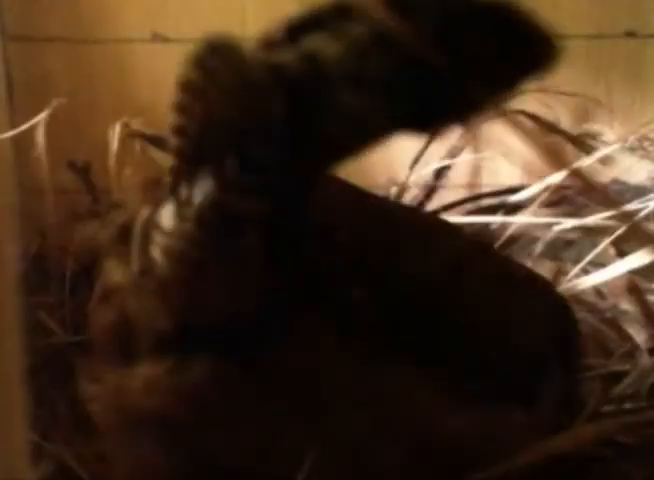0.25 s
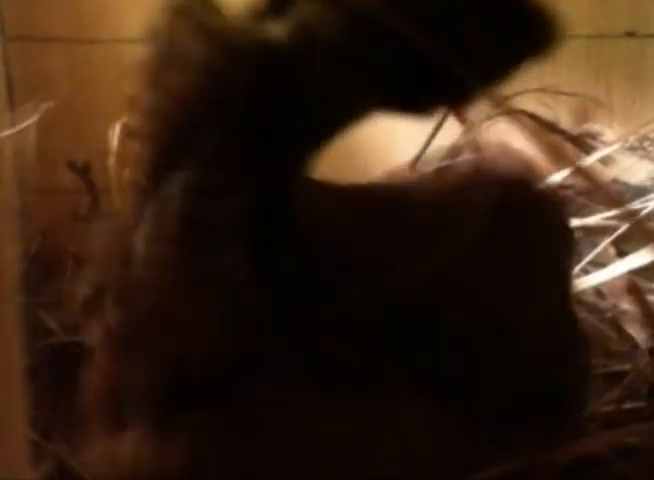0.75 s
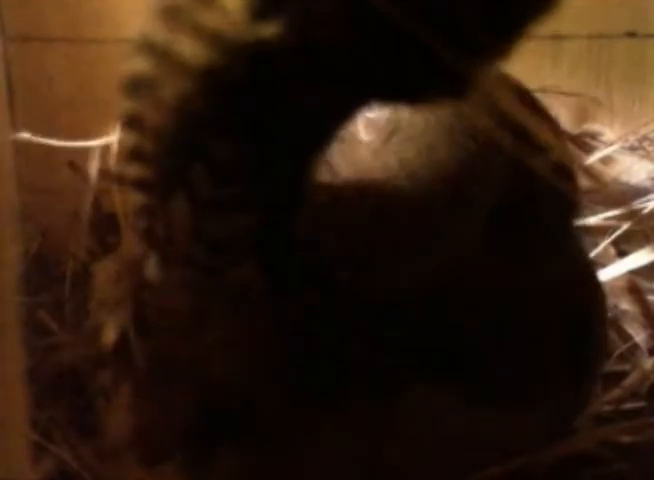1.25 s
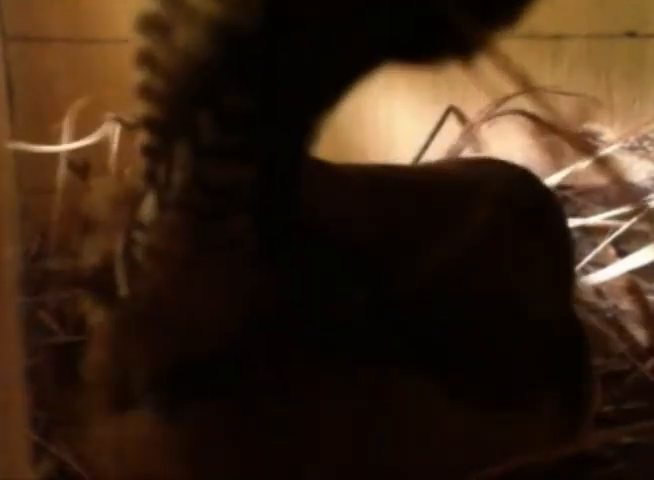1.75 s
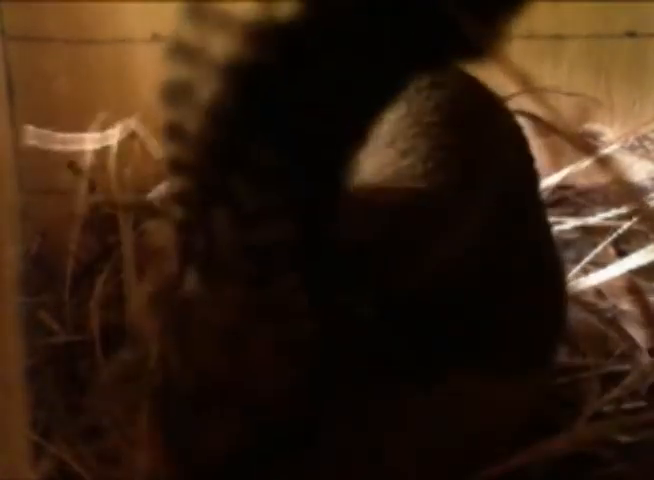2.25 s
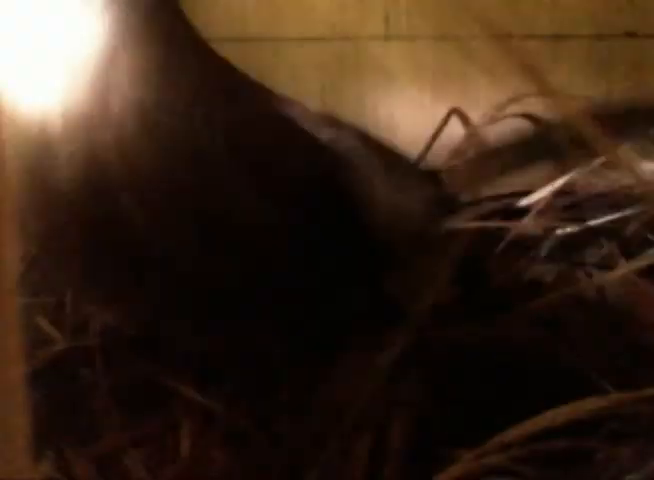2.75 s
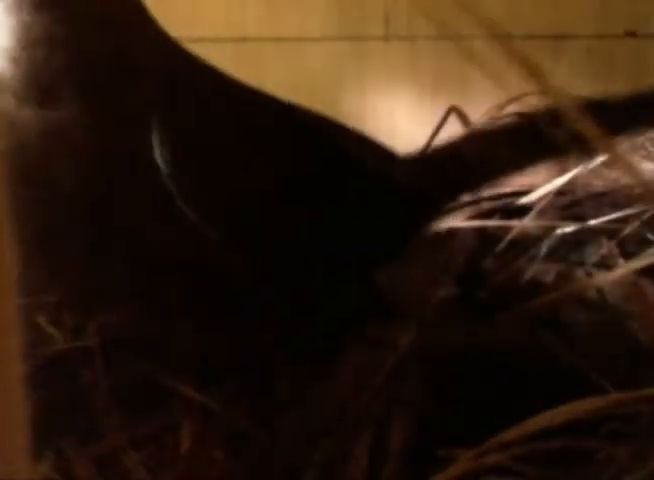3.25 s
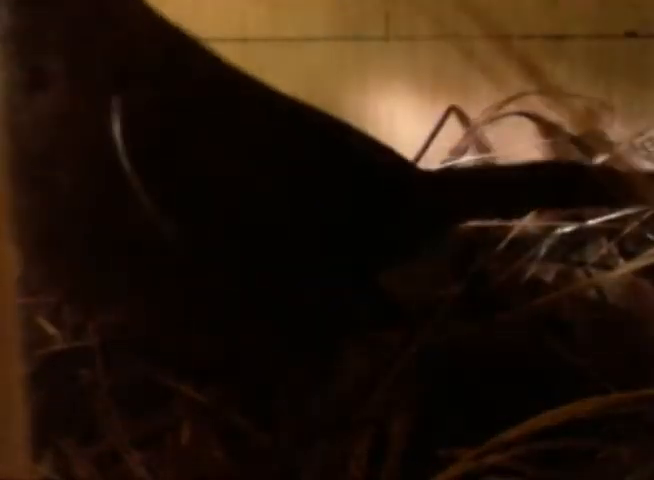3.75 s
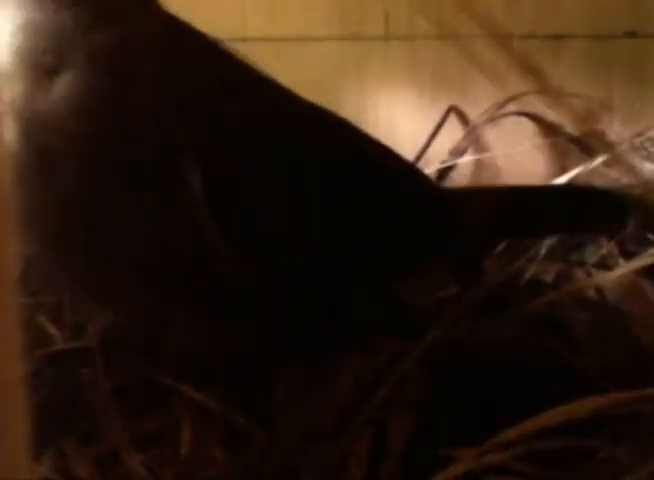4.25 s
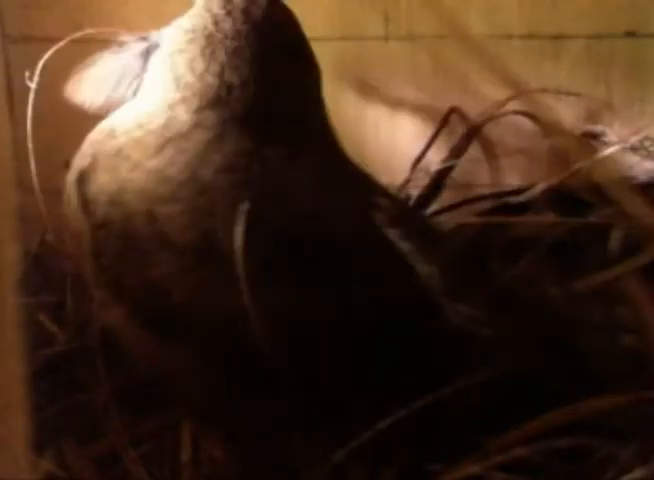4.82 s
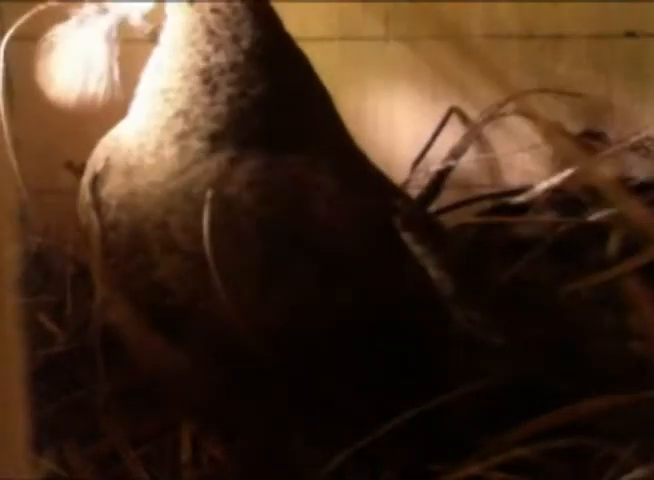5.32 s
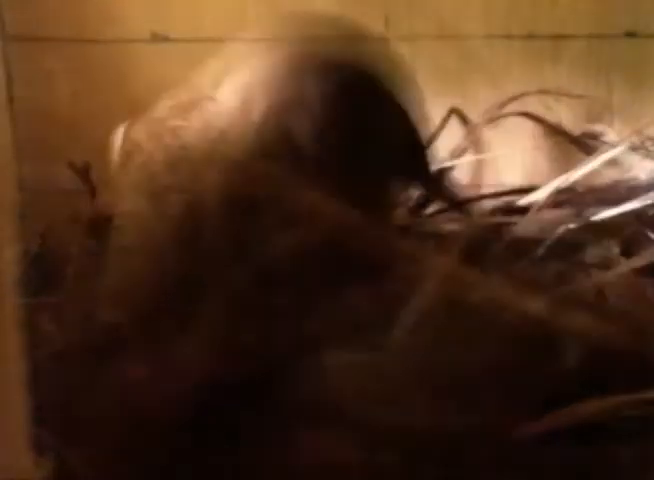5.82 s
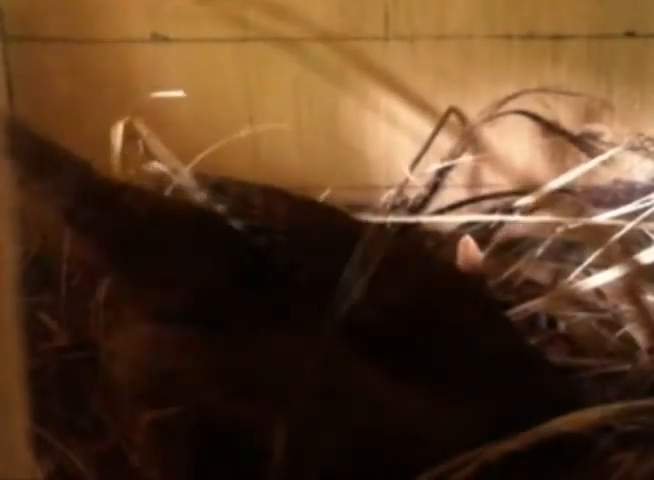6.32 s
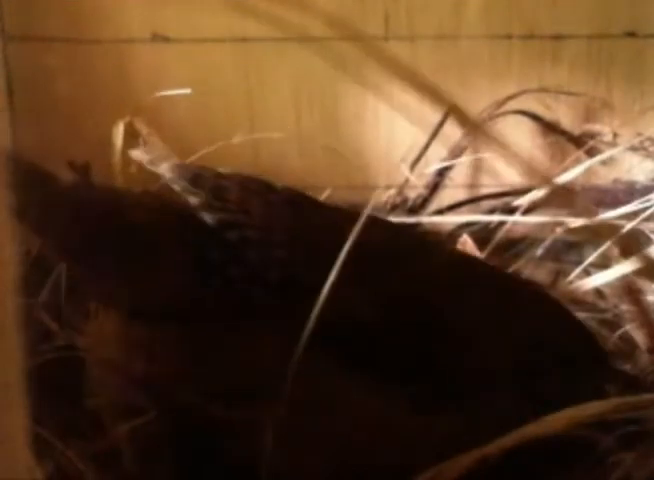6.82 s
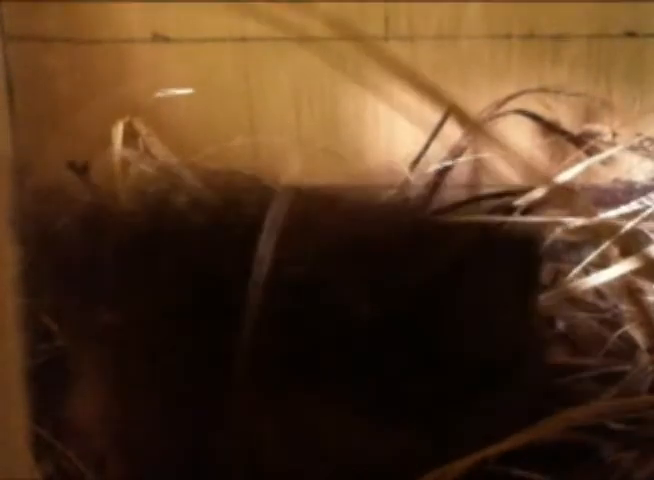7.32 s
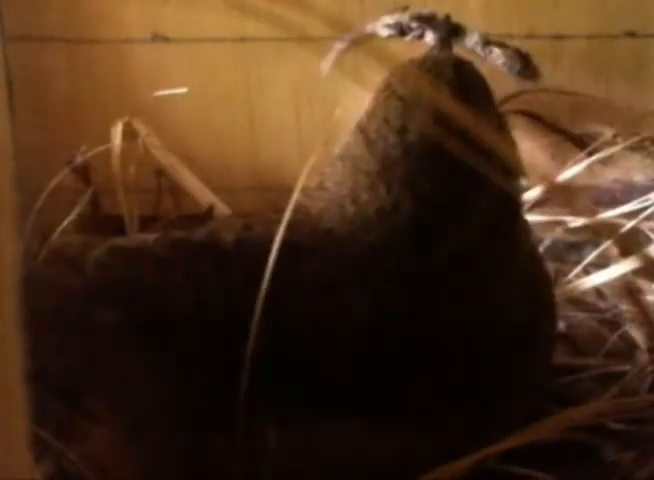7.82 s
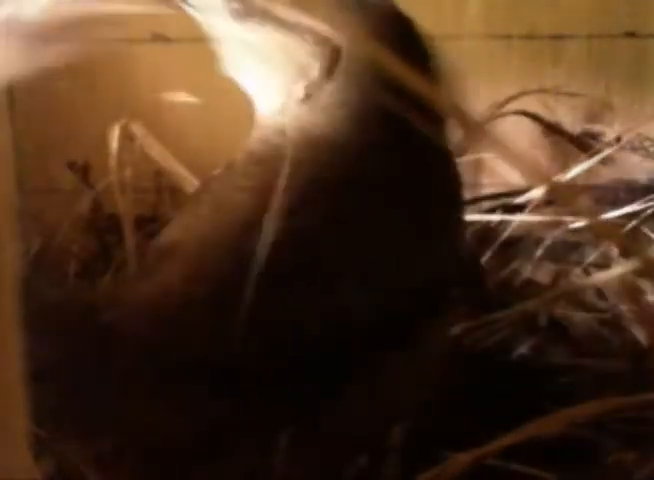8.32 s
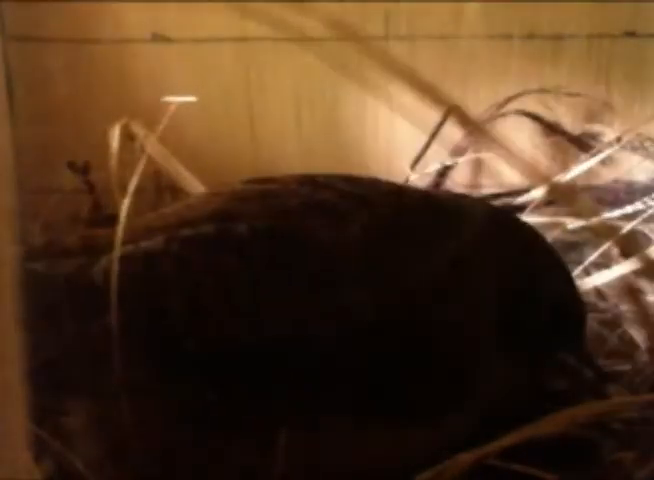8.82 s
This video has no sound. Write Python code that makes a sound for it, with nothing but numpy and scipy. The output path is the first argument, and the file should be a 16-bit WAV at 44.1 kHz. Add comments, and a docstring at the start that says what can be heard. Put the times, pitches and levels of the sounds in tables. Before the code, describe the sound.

Dry rustles and soft bumps in a nest box, with two bright bursts of wren song, distant birds and microphone hiss.

```python
"""Inside a wooden nest box. A low outdoor murmur and a small camera microphone's hiss and whine throughout.
First a bird in the box settles, treads and shuffles in dry grass and bumps the boards.
From 0.5 s other birds call far off. At 1.2 s a wren outside leads with soft chatter into a bubbling phrase.
The bird in the box stirs again near 4 s and 6 s; at 6.5 s the wren starts its second chatter and phrase."""
import sys
import numpy as np
from scipy import signal
from scipy.fft import rfft, irfft, next_fast_len
from scipy.io import wavfile

SR = 44100
rng = np.random.default_rng(int(sys.argv[2]) if len(sys.argv) > 2 else 0)


def generate_wav(signal):
    """Clip the signal to [-1, 1] and save it as 16-bit WAV at the path in sys.argv[1]."""
    frames = np.transpose(np.atleast_2d(signal))
    scaled = np.clip(frames, -1, 1) * 32767
    pcm = np.round(scaled).astype(np.int16)
    wavfile.write(sys.argv[1], SR, pcm)


N = 399987


def undb(db):
    """Decibels to gain."""
    return 10 ** (np.asarray(db) / 20)


def level(x, db):
    """Scale to an rms level."""
    return x * undb(db) / np.sqrt(np.mean(x ** 2))


def add(out, start_s, x):
    """Mix x into out from start_s on."""
    i = max(int(start_s * SR), 0)
    out[i:i + len(x)] += x[:len(out) - i]


def colour(x, points):
    """Filter by a curve of (frequency [Hz], gain [dB]) points."""
    hz, db = np.transpose(points)
    size = next_fast_len(len(x), real=True)
    bins_hz = np.maximum(np.fft.rfftfreq(size, 1 / SR), 1)
    gain = undb(np.interp(np.log(bins_hz), np.log(hz), db))
    return irfft(rfft(x, size) * gain, size)[:len(x)]


def ring(x, modes):
    """Damped resonances, neighbours in opposite phase; white noise keeps its level."""
    t = np.arange(SR // 10) / SR
    response = 0
    for k, (hz, width_hz, db) in enumerate(modes):
        decay = undb(db) * width_hz * np.exp(-np.pi * width_hz * t)
        response += (-1) ** k * decay * np.sin(2 * np.pi * hz * t)
    return signal.oaconvolve(x, response / np.linalg.norm(response))[:len(x)]


def walk(size, rate_hz):
    """Random wander, spread near 1."""
    steps = np.arange(size) * rate_hz / SR
    knots = int(steps[-1]) + 2
    return np.interp(steps, np.arange(knots), rng.standard_normal(knots))


def outdoors():
    """A low murmur swells a little and sounds the hollow of the box."""
    # murmur spectrum: (frequency [Hz], gain [dB])
    murmur_curve = [(20, 0.5), (38, 3), (60, -0.5), (120, -3), (230, -6.5), (400, -9), (650, -14),
                    (1000, -18), (2000, -22), (5000, -35), (15000, -51)]
    # box hum: (frequency [Hz], width [Hz], gain [dB])
    hollow_modes = [(282.3, 22, 2.5), (372, 20, -19), (469, 35, -2), (1200, 110, -16)]
    murmur = level(colour(rng.standard_normal(N), murmur_curve), db=-43.5)
    hollow = level(ring(rng.standard_normal(N), hollow_modes), db=-51)
    return murmur * undb(0.6 * walk(N, rate_hz=6.7)) + hollow * undb(0.65 * walk(N, rate_hz=5))


def floor_thumps(crest=0.35):
    """The bird lets its weight down on the padded floor."""
    # settling: (time [s], time scale [s], level [dB])
    settles = [(.008, 0.056, -32), (0.127, 0.059, -39)]
    # dull floor spectrum: (frequency [Hz], gain [dB])
    floor_curve = [(60, -7), (170, -2.5), (270, -1), (380, -13), (1000, -47)]
    load = np.zeros(N)
    for start_s, scale_s, db in settles:
        u = np.arange(int(5 * scale_s * SR)) / (scale_s * SR)
        add(load, start_s, undb(db) * (u / crest) * np.exp(1 - u / crest))
    return load * level(colour(rng.standard_normal(N), floor_curve), db=0)


def contacts(snap_s=0.005, rebound_s=0.013, rebound_db=-13):
    """Moves in the nest: (time [s], time scale [s], straw/boards/box levels [dB])."""
    # straws snapping under a claw: (time [s], level [dB])
    straw_snaps = [(0.0718, -23.5), (0.1118, -27), (0.149, -29.5), (0.319, -30.5), (.365, -37), (.574, -36),
                   (1.705, -41), (3.282, -39), (5.895, -31.5)]
    # claws on the boards: (time [s], time scale [s], level [dB])
    scratches = [(.08, 0.02, -33.5), (.155, 0.047, -40), (.282, 0.03, -42.5), (.328, 0.033, -33),
                 (.366, 0.025, -34), (.462, .016, -31)]
    # feathers through straw: (time [s], time scale [s], level [dB])
    shuffles = [(.225, 0.027, -41.5), (.531, 0.04, -32), (.935, 0.044, -41), (.99, 0.18, -45.5),
                (1.054, .03, -36.5), (1.098, .05, -40.5), (3.965, 0.077, -43), (5.924, 0.075, -40),
                (5.986, .043, -38), (6.04, 0.071, -41)]
    # body against the walls: (time [s], time scale [s], level [dB])
    bumps = [(.466, 0.016, -29), (.548, 0.016, -29), (.595, 0.035, -37), (1.066, 0.017, -35),
             (5.888, 0.041, -36)]
    # split per kind of contact: (straw [dB], boards [dB], box [dB])
    split_db = {"snap": (0, -6, -8.5), "scratch": (-9, 0, -3.9), "shuffle": (0, -5.5, 1.3),
                "bump": (-16, -15, 0)}
    snaps = [(start_s + lag_s, snap_s, db + drop_db) for start_s, db in straw_snaps
             for lag_s, drop_db in ((0, 0), (rebound_s, rebound_db))]  # each stem springs back once
    moves = {"snap": snaps, "scratch": scratches, "shuffle": shuffles, "bump": bumps}
    return [(start_s, scale_s, db + np.array(split_db[kind]))
            for kind, rows in moves.items() for start_s, scale_s, db in rows]


def nest(grain_db=0.5, slip_hz=600, crest=0.26, linger=0.16, straw_db=1.4, boards_db=-3, box_db=-1):
    """Each contact is a run of tiny slips: straw crackles, boards rasp, the box thuds."""
    # dry straw spectrum: (frequency [Hz], gain [dB])
    straw_curve = [(1500, -13), (4000, -6), (5400, -4.5), (6500, -3), (8500, -4), (10300, 2.5), (11500, 0),
                   (12300, 3.5), (12900, -3), (15500, -6)]
    # board resonances: (frequency [Hz], width [Hz], gain [dB])
    board_modes = [(1280, 68, 10), (1670, 110, -1), (2290, 165, 4), (2670, 93, 5.5), (3340, 280, 1),
                   (3910, 140, 0), (6340, 700, -5)]
    # box resonances: (frequency [Hz], width [Hz], gain [dB])
    box_modes = [(155, 76, -5.5), (208, 26, -4.5), (314, 68, -1.5), (390, 55, 0), (501, 73, 1.5),
                 (600, 66, -29.5)]
    drives = np.zeros((3, N))
    for start_s, scale_s, levels_db in contacts():
        u = np.arange(int(5 * scale_s * SR)) / (scale_s * SR)
        push = (u / crest) * np.exp(1 - u / crest) + linger * u * np.exp(1 - u)  # shove, then stems settle
        slips = level(undb(grain_db * walk(len(u), slip_hz)), db=0)
        for drive, db in zip(drives, levels_db):
            add(drive, start_s, undb(db) * push * slips * rng.standard_normal(len(u)))
    crackle = undb(straw_db) * colour(drives[0], straw_curve)
    rasp = undb(boards_db) * ring(drives[1], board_modes)
    thud = undb(box_db) * ring(drives[2], box_modes)
    return crackle + rasp + thud


def whistle(length_s, pitches_hz, crest, rough, flutter_hz, wobble, swell_power=0.83):
    """A glide through three pitches, swelling and fading; an unsteady membrane shakes it."""
    u = np.linspace(0, 1, int(length_s * SR))
    glide_hz = np.polyval(np.polyfit([0, 0.5, 1], pitches_hz, 2), u)
    pitch_hz = glide_hz * (1 + rough * wobble * walk(len(u), flutter_hz))
    swell = np.interp(u, [0, np.clip(crest, 0.1, 0.9), 1], [0, 1, 0]) ** swell_power
    flutter = 1 + 0.5 * rough * walk(len(u), flutter_hz)
    return swell * flutter * np.sin(2 * np.pi * np.cumsum(pitch_hz) / SR)


def far_birds(direct_db=-7):
    """Thin whistles and hoarse calls, half lost in their echo."""
    # distant calls: (time [s], kind, level [dB])
    far_calls = [(.49, "pip", -43), (.62, "pip", -46.5), (.655, "tsip", -46), (.95, "sweep", -49),
                 (1.185, "sweep", -46.5), (1.46, "sweep", -51.5), (2.42, "caw", -41.5),
                 (3.925, "wisp", -40), (3.93, "tsip", -47), (4.015, "wisp", -46), (4.21, "caw", -45),
                 (4.28, "tsip", -55), (4.44, "tsip", -47.5), (4.625, "wisp", -47), (4.63, "tsip", -51),
                 (4.765, "pip", -43.5), (5.945, "wisp", -40), (6.02, "wisp", -44), (6.129, "see", -47.5),
                 (6.35, "see", -45), (6.541, "wisp", -41), (7.14, "caw", -42.5), (8.0, "sweep", -49.5),
                 (8.14, "sweep", -48.5), (8.3, "see", -45)]
    # glide per kind: (length [s], start [Hz], middle [Hz], end [Hz], crest [of length], roughness [0-1])
    call_kinds = { "pip": (0.038, 2800, 2780, 2760, 0.27, .03), "wisp": (.055, 4450, 4350, 4000, 0.2, 0.67),
                  "see": (0.11, 6450, 6450, 5700, 0.13, 0.17),
                  "tsip": (0.059, 6650, 6700, 6500, 0.22, 0.47),
                  "sweep": (.22, 4900, 6750, 5600, 0.43, 0.51),
                  "caw": (0.317, 1200, 1255, 1210, 0.27, 0.52), }
    calls = np.zeros(N)
    for start_s, kind, db in far_calls:
        length_s, *pitches_hz, crest, rough = call_kinds[kind]
        call = whistle(length_s, pitches_hz, crest, rough, flutter_hz=604, wobble=0.09)
        add(calls, start_s, undb(db) * call)
    return undb(direct_db) * calls + garden_echo(calls, early_db=-8.5, late_db=-4.5)


def garden_echo(x, early_db, late_db, early_t60_s=0.28, late_t60_s=0.67):
    """Scatter from near leaves and walls, then a longer wash from the trees."""
    # echo spectrum: (frequency [Hz], gain [dB])
    echo_curve = [(1000, -14), (3000, 2), (4300, -2), (5800, 8), (7000, 0), (9000, -1.5)]
    t = np.arange(SR) / SR
    onset = 1 - np.exp(-t / 0.0011)
    response = 0
    for db, t60_s in ((early_db, early_t60_s), (late_db, late_t60_s)):
        tail = colour(rng.standard_normal(SR), echo_curve) * undb(-60 * t / t60_s) * onset
        response += undb(db) * tail / np.linalg.norm(tail)
    return signal.fftconvolve(x, response)[:N]


def wren(song_db=-7, chatter_db=-6.5):
    """Buzzy chatter, then clear notes, scattered by the garden and entering by the hole."""
    # nasal lead-in: (time [s], count, pitch length [s], pitch [Hz], level [dB])
    chatter = [(1.284, 1, 0.029, 615, -45.5), (1.365, 1, 0.029, 614, -47.5), (1.469, 1, .075, 777, -43),
               (1.647, 3, 0.02, 533, -43.5), (1.865, 1, 0.038, 560, -41.5), (2.126, 1, 0.024, 595, -38.5),
               (6.669, 1, 0.025, 624, -46), (6.79, 1, .066, 592, -43), (6.969, 4, 0.02, 623, -44),
               (7.231, 1, 0.038, 564, -42.5), (7.497, 1, .027, 592, -38)]
    # two phrases: (time [s], syllable, count, pitch ratio, level [dB], gain per repeat [dB])
    song = [(1.162, "slur", 1, 1.03, -38, 0), (1.792, "rise", 1, 1, -40.5, 0),
            (1.919, "chip", 1, 1.015, -29.5, 4), (2.034, "flick", 1, 0.99, -22.5, 0),
            (2.187, "hook", 1, 1.01, -28.5, 0), (2.243, "warble", 1, 1.114, -20, 2),
            (2.364, "warble", 3, 1.03, -20, -0.7), (2.741, "arch", 2, 0.98, -26, 1),
            (2.976, "lift", 1, 1.05, -22, -1), (3.0327, "trill", 4, 1, -20, -0.5),
            (3.281, "close", 1, 1, -25, 0), (6.46, "slur", 1, 1, -38, 0), (7.157, "rise", 1, 1.06, -36, 0),
            (7.29, "chip", 1, 1.07, -27.5, 0), (7.406, "flick", 1, 1, -24.5, 0),
            (7.557, "hook", 1, 1, -25, 0), (7.615, "warble", 1, 1.07, -21, 6),
            (7.74, "warble", 2, 1.03, -20, -1.8), (7.987, "arch", 3, 0.99, -27.5, -0.5),
            (8.352, "lift", 1, 0.92, -26.5, 0), (8.4075, "trill", 4, 1.01, -25.5, 0.45),
            (8.652, "close", 1, 0.97, -32, -2.5)]
    # glides per syllable:
    # (delay [s], length [s], start [Hz], middle [Hz], end [Hz], crest [of length], level [dB])
    syllables = { "slur": [(0, 0.025, 4220, 4400, 4200, .5, -1),
                 (.026, 0.0305, 4050, 3710, 3400, 0.25, -1.5)],
                 "rise": [(0, 0.014, 3350, 4300, 6300, .3, 3.5),
                 (.012, 0.025, 5300, 6050, 8000, 0.25, -2.5), (0, .052, 4000, 3400, 5400, 0.88, -5.5)],
                 "chip": [(0, 0.0136, 5600, 5560, 5060, 0.6, -7),
                 (.013, 0.0113, 5340, 4470, 3370, 0.25, 2.5), (.054, .034, 2600, 3700, 3500, .42, -.5)],
                 "flick": [(0, 0.0148, 5000, 6500, 7100, 0.48, -11),
                 (.011, .015, 7570, 5710, 3900, 0.3, -1.5)],
                 "hook": [(0, 0.0168, 7610, 6276, 7300, 0.17, -1.5),
                 (.014, 0.031, 7270, 8050, 7950, 0.12, -7)],
                 "warble": [(-.002, .033, 4640, 4043, 3250, 0.83, -1.5),
                 (.037, 0.0138, 4910, 3995, 3440, 0.74, -4), (.055, .033, 3050, 2890, 2200, .48, -8)],
                 "arch": [(0, 0.026, 1930, 2050, 2030, .6, -11), (.039, 0.022, 2530, 2447, 2500, 0.45, -6),
                 (.055, .018, 3250, 3750, 3400, .55, -1), (.07, 0.0166, 3390, 2860, 2120, 0.083, -3.5)],
                 "lift": [(0, 0.012, 4080, 3900, 3830, 0.64, -6), (.014, 0.0113, 3950, 5170, 6400, .5, -2),
                 (.021, .017, 6190, 6700, 6500, .45, -0.5)],
                 "trill": [(.0025, 0.0088, 5805, 4750, 3730, .42, -4.5),
                 (.009, .014, 3790, 4780, 6430, 0.64, -9.5), (.0175, 0.0099, 6100, 6780, 7450, 0.53, 1.8)],
                 "close": [(0, .028, 4198, 3098, 2530, 0.083, -3),
                 (.031, 0.023, 5130, 4196, 4100, 0.42, 0.5)], }
    voice = np.zeros(N)
    for first_s, count, length_s, hz, db in chatter:
        for start_s in repeats(first_s, "chatter", count):
            add(voice, start_s, undb(db + chatter_db) * buzz(length_s, hz))
    for first_s, kind, count, ratio, db, step_db in song:
        for k, start_s in enumerate(repeats(first_s, kind, count)):
            for delay_s, length_s, *pitches_hz, crest, note_db in syllables[kind]:
                sung_hz = ratio * np.array(pitches_hz)
                note = whistle(length_s, sung_hz, crest, rough=0.62, flutter_hz=419, wobble=0.042)
                add(voice, start_s + delay_s, undb(db + k * step_db + note_db + song_db) * note)
    near = box_reflections(near_echoes(voice))
    return standing_waves(near + garden_echo(voice, early_db=-7.5, late_db=-10.5))


def repeats(first_s, kind, count, slowing=0.043):
    """Start times of a run that slows as it goes."""
    # first repeat interval per kind [s]
    interval_s = {"warble": .1195, "arch": .1255, "trill": .058, "chatter": .0475}
    times_s = [first_s]
    for k in range(count - 1):
        times_s.append(times_s[-1] + interval_s[kind] * (1 + slowing) ** k)
    return times_s


def near_echoes(x):
    """Direct sound plus bounces off surfaces just outside the box."""
    # bounces: (delay [ms], gain [linear])
    bounces = [(4.7, 0.23), (7.3, -0.098)]
    heard = x.copy()
    for delay_ms, gain in bounces:
        add(heard, delay_ms / 1000, gain * x)
    return heard


def box_reflections(x, db=-8, t60_s=0.014):
    """Quick reflections between the close walls blur each glide."""
    t = np.arange(SR // 20) / SR
    tail = rng.standard_normal(len(t)) * undb(-60 * t / t60_s)
    return x + undb(db) * signal.oaconvolve(x, tail / np.linalg.norm(tail))[:N]


def standing_waves(x):
    """The air in the box lifts the sound at each of its modes."""
    # modes between the walls: (frequency [Hz], width [Hz], lift [dB])
    air_modes = [(2480, 93, 8.5), (2760, 74, 10), (3156, 41, 10), (3686, 370, 7), (4183, 32, 6),
                 (4820, 236, 7.5), (6070, 56, 12.5), (6690, 160, 9), (7100, 180, 2)]
    for hz, width_hz, db in air_modes:
        band = signal.lfilter(*signal.iirpeak(hz, hz / width_hz, SR), x)
        x = x + (undb(db) - 1) * band
    return x


def buzz(length_s, hz, arch=0.11, fall=0.099, throat_hz=2650, throat_log_width=0.37, jitter=0.045):
    """A nasal note: harmonics arch and sag, heard through a narrowing throat."""
    u = np.linspace(0, 1, int(length_s * SR))
    bend = arch * (np.sin(np.pi * u) - 2 / np.pi) - fall * (u - 0.5)
    pitch_hz = hz * (1 + bend + jitter * walk(len(u), rate_hz=770))
    phase = 2 * np.pi * np.cumsum(pitch_hz) / SR
    k = np.arange(3, 10)[:, None]  # harmonic numbers
    detune = np.log(k * pitch_hz / throat_hz) / throat_log_width + 0.77 * (u - 0.5)  # formant slides down
    harmonics = np.exp(-0.5 * detune ** 2) * np.sin(k * phase + k ** 2)
    swell = np.sin(np.pi * u) ** 0.25
    return level(swell * harmonics.sum(axis=0), db=-4.5)


def scene():
    """All that reaches the microphone in the box, mono."""
    return (wren() + far_birds() + nest() + floor_thumps() + outdoors())[None]


def record(dry, dc_offset=-0.097, cutoff_hz=15750):
    """The camera adds hiss, a thin whine and a steady offset, and cuts the top."""
    # hiss spectrum: (frequency [Hz], gain [dB])
    hiss_curve = [(500, -8), (3000, -1.5), (8000, -2.5), (11000, -2.5), (15500, 1.5)]
    # whine: (frequency [Hz], level [dB])
    whine_tones = [(8640, -68), (13119, -80)]
    t = np.arange(N) / SR
    hiss = level(colour(rng.standard_normal(N), hiss_curve), db=-46)
    whine = sum(level(np.sin(2 * np.pi * hz * t), db) for hz, db in whine_tones)
    lowpass = signal.ellip(12, 0.2, 80, cutoff_hz, fs=SR, output="sos")
    return dc_offset + signal.sosfilt(lowpass, dry + hiss + whine)


dry = scene()
out = record(dry)
generate_wav(out)
```